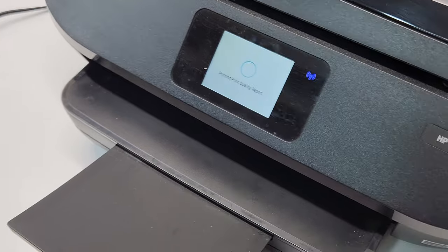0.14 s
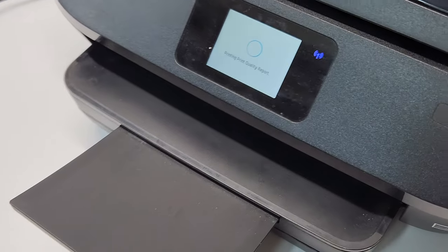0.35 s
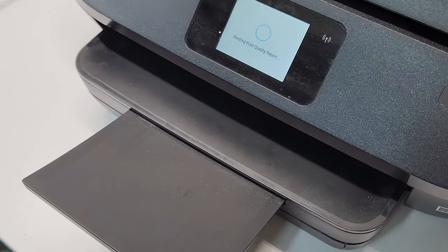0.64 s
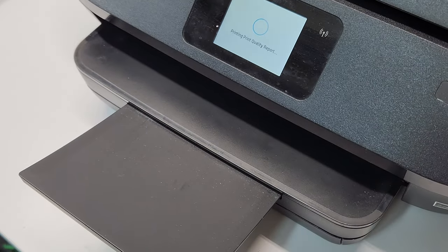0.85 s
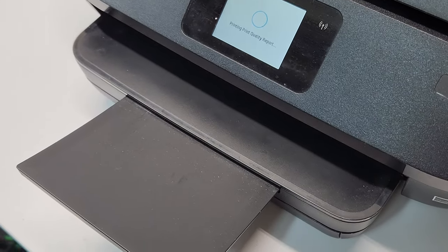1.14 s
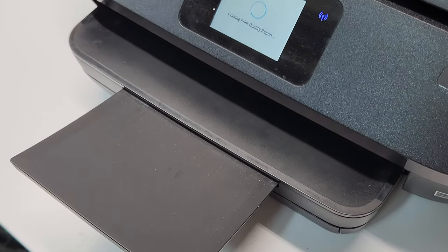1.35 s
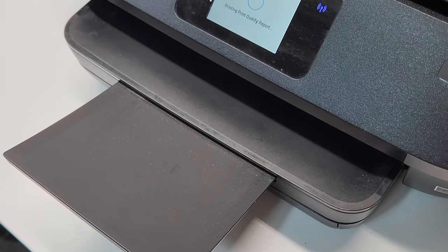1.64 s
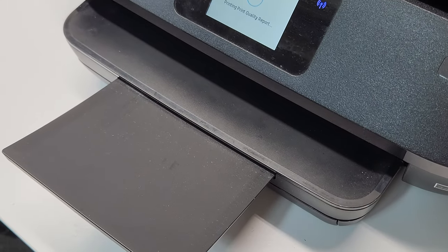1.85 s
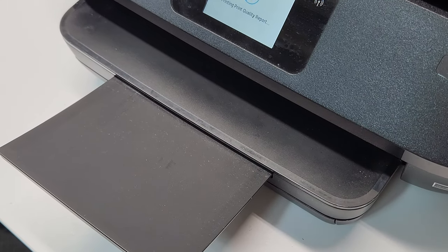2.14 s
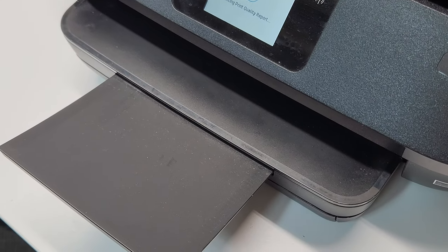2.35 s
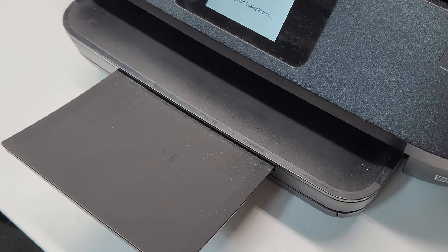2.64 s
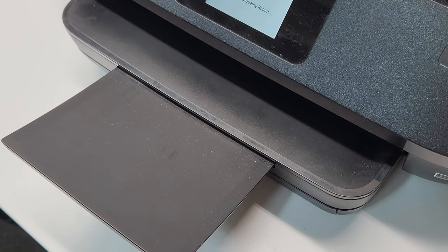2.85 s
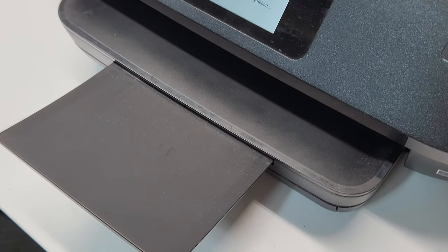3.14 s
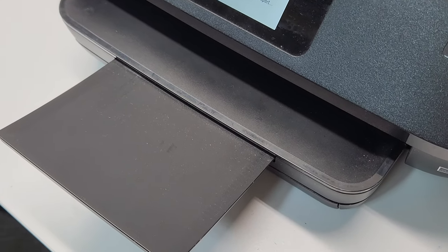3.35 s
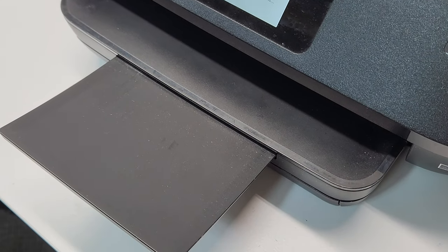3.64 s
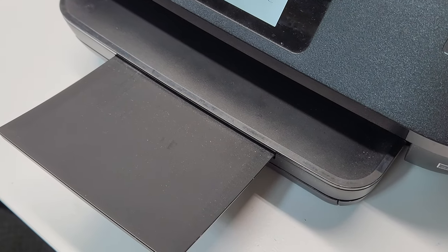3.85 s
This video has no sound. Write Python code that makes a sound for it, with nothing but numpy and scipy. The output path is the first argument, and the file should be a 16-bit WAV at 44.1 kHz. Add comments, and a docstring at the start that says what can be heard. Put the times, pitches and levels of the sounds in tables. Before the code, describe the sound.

Inkjet printer working: low wavering hum, three short rattling geared strokes, knocks and latch clicks

```python
"""A motor's whine dies away over a wavering low hum: an inkjet printer on a desk, close to the microphone.
A part catches and rubs, and the drive runs on quietly, hissing and rumbling from filtered noise.
Three short geared strokes, made of tooth clicks and scraping, rattle the resonant plastic case.
Knocks and latch snaps, bursts of noise that die in milliseconds, come with their starts and stops.
Another fast move whines with gear tones; a small room answers the printer and faint air lies beneath."""
import sys
import numpy as np
from scipy import signal
from scipy.fft import rfft, irfft
from scipy.io import wavfile
from scipy.ndimage import uniform_filter1d

SR = 44100
rng = np.random.default_rng(int(sys.argv[2]) if len(sys.argv) > 2 else 0)


def transcribe(signal):
    """Save signal, clipped to [-1, 1], as a 16-bit WAV file at the path in sys.argv[1]."""
    frames = np.atleast_2d(signal).T
    limited = np.clip(frames, -1, 1)
    pcm = np.round(limited * 32767).astype(np.int16)
    wavfile.write(sys.argv[1], SR, pcm)


N = 176400  # samples, 4 s

# ringing modes of the plastic case: f/Hz, width/Hz, level/dB
CASE_MODES = [(393, 10, -9), (439, 21, -9), (548, 26, -1.5), (601, 77, 5), (773, 70, -5), (869, 49, 3),
              (1007, 28, -7), (1166, 38, -0.5), (1383, 28, -2.5), (2160, 25, -6), (2520, 39, -13),
              (2980, 51, -10.5), (3280, 57, -11.5)]
INSIDE_T60_S = 0.0089  # echoes inside the case
MID_ONLY = np.array([[1], [0]])  # puts a sound in the middle, none in the side


def undb(db):
    """Decibels to gain."""
    return 10 ** (np.asarray(db) / 20)


def unit(x):
    """Scale to rms 1."""
    return x / np.sqrt(np.mean(x ** 2))


def noise():
    """Two unrelated white noises, one for the middle and one for the side."""
    return rng.standard_normal((2, N))


def bins_hz():
    """Frequency of every spectral bin, kept just above zero."""
    return np.arange(N // 2 + 1) * SR / N + 1e-6


def curve(points):
    """Gain at every frequency from (Hz, dB) points, joined on a logarithmic frequency axis."""
    hz, db = np.array(points, float).T
    return undb(np.interp(np.log(bins_hz()), np.log(hz), db))


def colour(points):
    """Causal (minimum-phase) response of unit power through (Hz, dB) points."""
    gain = curve(points)
    cepstrum = irfft(np.log(gain), N)
    cepstrum[1:N // 2] *= 2
    cepstrum[N // 2 + 1:] = 0
    return np.exp(rfft(cepstrum)) / np.sqrt(np.mean(gain ** 2))


def resonances(modes):
    """Response of unit power of (Hz, width, dB) modes, each dark well above its centre."""
    f = bins_hz()
    response = 0
    for hz, width, db in modes:
        peak = 1 / (1 + 1j * (f * f - hz * hz) / (f * width))
        response = response + undb(db) * peak / (1 + .5j * f / hz) ** 2
    return response / np.sqrt(np.mean(abs(response) ** 2))


def through(x, response):
    """Filter by a frequency response."""
    return irfft(rfft(x) * response, N)


def walk(rate):
    """Smooth random wander with spread near 1, drawn anew at this rate in Hz."""
    k = max(int(SR / rate), 1)
    steps = np.repeat(rng.standard_normal(N // k + 1), k)
    return unit(uniform_filter1d(uniform_filter1d(steps, k), k)[:N])


def gate(start, length, attack, release, swell_db=0):
    """Linear attack, a hold that swells from -1.5 to -0.5 times swell_db, and an exponential release."""
    t = np.arange(N) / SR - start
    rise = np.clip(t / attack, 0, 1)
    swell = undb(swell_db * (np.clip(t / length, 0, 1) - 1.5))
    return rise * swell * np.exp(-np.maximum(t - length, 0) / release)


def blows(rows, decay_s, response):
    """Each (s, dB) blow is a sudden burst of contact chatter that dies in milliseconds."""
    t = np.arange(N) / SR
    force = sum(undb(db) * (t >= s) * np.exp(-np.maximum(t - s, 0) / decay_s) for s, db in rows)
    return through(force * noise(), response)


def tail(t60):
    """Two unrelated tails of dense echoes, of unit energy, falling 60 dB in t60 seconds."""
    h = noise() * undb(-60 * np.arange(N) / SR / t60)
    return h / np.sqrt(np.sum(h ** 2, axis=1, keepdims=True))


def cavity():
    """The inside of the case: direct sound plus a share of very short echoes."""
    share = 0.24  # of the power
    return np.sqrt(1 - share) + np.sqrt(share) * rfft(tail(INSIDE_T60_S))


def hum():
    """Low motor tones that waver in strength and phase while their common level drifts."""
    # motor tones: f/Hz, level before the drift/dB, wavering share
    tones = [(59.2, -55, .5), (118.6, -47, .5), (123, -52, .7), (279.5, -60, .4), (298, -59, .6)]
    # drift of the hum: t/s, level/dB
    drift = [(0, 1), (.8, 1), (1.05, -1.5), (1.4, -0.5), (2.5, 0.5), (2.75, -2), (3.2, -4.5), (3.4, 2.5),
             (3.6, -4), (4, -2.5)]
    waver_hz = 14
    turn = 2j * np.pi * np.arange(N) / SR
    out = 0
    for hz, db, waver in tones:
        size = 1 + waver * (walk(waver_hz) + 1j * walk(waver_hz))
        out = out + undb(db) * unit(np.real(size * np.exp(turn * hz)))
    return out * undb(np.interp(np.arange(N) / SR, *np.array(drift).T))


def moving_air():
    """Faint air around the microphone: coloured noise whose level flickers slightly."""
    # spectrum of the air: f/Hz, level per Hz/dB
    spectrum = [(20, -14), (60, -5.5), (90, -9.5), (120, -3), (150, -13), (190, -24.5), (225, -18),
                (295, -18.5), (340, -25.5), (650, -29), (1000, -32.5), (1500, -34), (1800, -39),
                (2300, -40), (3700, -51.5), (5200, -51), (6400, -59), (7900, -58.5), (9600, -64),
                (11000, -73), (16000, -69)]
    level_db, flicker_db = -44.5, 1.12
    return undb(level_db + flicker_db * walk(11)) * through(noise(), colour(spectrum))


def gear_tones():
    """Meshing gears follow one pitch; each tone wobbles and flutters on its own."""
    # path of the gear pitch: t/s, f/Hz
    pitch = [(0, 1025), (2.168, 1020), (2.212, 1007), (2.28, 1028), (2.295, 1055)]
    # tones of the gears: multiple of the pitch, level/dB
    partials = [(1, 0), (1.74, -16), (2.11, -12), (2.99, -16)]
    wobble, flutter_db = .015, 2.5
    hz = np.interp(np.arange(N) / SR, *np.array(pitch).T)
    out = 0
    for multiple, db in partials:
        size = undb(db + flutter_db * walk(70))
        phase = 2 * np.pi * np.cumsum(multiple * hz * (1 + wobble * walk(200))) / SR
        out = out + size * np.sin(phase)
    return unit(out)


def motor_whistle():
    """A thin motor whistle: one sine that glides up and down, with a shaky pitch and level."""
    # path of the whistle: t/s, f/Hz
    path = [(.035, 12500), (.07, 13500), (.095, 13500), (.115, 12800), (.145, 12200)]
    level_db = -77
    at, hz = np.array(path).T
    pitch = np.interp(np.arange(N) / SR, at, hz) * (1 + 0.0036 * walk(600))
    tone = np.sin(2 * np.pi * np.cumsum(pitch) / SR) * undb(2.4 * walk(210))
    return undb(level_db) * tone * gate(at[0], at[-1] - at[0], .02, 0.0035)


def motor():
    """Fast moves sing surging gear tones over gritty whirr, chatter and hiss; a thin whistle joins once."""
    # fast moves: start t/s, length/s, level/dB, gear tone above that level/dB
    moves = [(-.1, .1, -48.5, 9), (2.131, .139, -47.5, 2.5)]
    # ringing of the whine: f/Hz, width/Hz, level/dB
    whine_modes = [(1060, 90, 1), (1423, 80, 2), (1870, 120, 1), (2130, 120, 0.5), (2660, 45, -14),
                   (3030, 110, -6.5)]
    # spectrum of the hiss: f/Hz, level per Hz/dB
    hiss_spectrum = [(300, -29), (800, 2.5), (2200, 1), (3800, -4.5), (5700, -1.5), (8000, -9.5),
                     (12000, -16), (16000, -23)]
    # gear chatter within a fast move: t/s, level/dB
    chatters = [(2.156, -47), (2.198, -49), (2.213, -50), (2.23, -48), (2.241, -48)]
    attack_s, release_s, chatter_decay_s = 0.022, 0.032, 0.0083
    tone_lag_s, tone_attack_s, tone_release_s = .013, .012, .007
    turn_s, turn_dip_db = .054, -11  # the tones dip once in each turn of the shaft
    whirr_db, hiss_db, grit_db, grit_hz = -15, -5.5, -2, 139
    t = np.arange(N) / SR
    effort, singing = 0, 0
    for s, length, db, tone_db in moves:
        effort = effort + undb(db) * gate(s, length, attack_s, release_s)
        sing_at = s + tone_lag_s
        dip = np.cos(np.pi * (t - sing_at) / turn_s) ** 8
        level = undb(db + tone_db + turn_dip_db * dip)
        singing = singing + level * gate(sing_at, length, tone_attack_s, tone_release_s)
    ring = resonances(whine_modes)
    whirr = unit(through(noise() * undb(grit_db * walk(grit_hz)), ring))
    hiss = through(noise(), colour(hiss_spectrum))
    tones = singing * gear_tones() + motor_whistle()
    chatter = blows(chatters, chatter_decay_s, ring)
    return effort * (undb(whirr_db) * whirr + undb(hiss_db) * hiss) + chatter + tones * MID_ONLY


def drive():
    """Slow running: shafts hiss and ring faintly inside the case, and the chassis rumbles and drones."""
    # slow runs: start t/s, length/s, hiss level/dB, rumble level/dB, swell/dB (levels before the swell)
    runs = [(0.015, 0.2, -63.5, -49.5, -0.5), (0.39, 0.125, -58, -50.5, -3.5), (1.045, 0.44, -70, -64, -1),
            (1.986, 0.15, -61, -42, 0.5), (2.141, 0.42, -67, -47, 0), (2.51, 0.36, -63, -52.5, 0.5),
            (2.89, 0.392, -62, -47, 1)]
    # spectra of hiss and rumble: f/Hz, level per Hz/dB
    hiss_spectrum = [(400, 12.5), (1200, -1.5), (2400, 1.5), (4000, -2), (6500, -14.5), (9500, -14.5),
                     (15000, -36)]
    rumble_spectrum = [(30, -7.5), (75, 7), (125, 1), (170, 1.5), (250, -4), (350, -12.5), (530, -10.5),
                       (800, -17), (2000, -63)]
    # ringing of shafts and frame, of the drone, and low in the chassis: f/Hz, width/Hz, level/dB
    shaft_modes = [(523, 23, 8), (3100, 120, -1), (3410, 75, -2.5), (3970, 75, -15), (4750, 240, -7),
                   (7330, 240, -13)]
    drone_modes = [(522, 14, 0), (619, 25, -6), (861, 30, -9)]
    chassis_modes = [(168, 15, 1), (214, 17.5, 1), (256, 19, -0.5), (367, 21.4, -7)]
    attack_s, release_s = 0.015, 0.028
    ring_db, rumble_db, chassis_db = -9.5, -3, -3.5
    drone_db, drone_start_s, drone_length_s = -54.5, .39, .17
    hiss, rumble = 0, 0
    for s, length, run_hiss_db, run_rumble_db, swell in runs:
        on = gate(s, length, attack_s, release_s, swell)
        hiss = hiss + undb(run_hiss_db) * on
        rumble = rumble + undb(run_rumble_db) * on
    shafts = through(noise(), colour(hiss_spectrum) * cavity())
    shafts = shafts + undb(ring_db) * through(noise(), resonances(shaft_modes))
    chassis = undb(rumble_db) * through(noise(), colour(rumble_spectrum))
    chassis = chassis + undb(chassis_db) * through(noise(), resonances(chassis_modes))
    drone = undb(drone_db) * through(noise(), resonances(drone_modes))
    drone = drone * gate(drone_start_s, drone_length_s, attack_s, release_s)
    return hiss * shafts + rumble * chassis + drone


def rubbing():
    """A light part catches and then drags, ringing the same modes."""
    # catches: t/s, level/dB
    catches = [(.098, -50), (.104, -43)]
    # rubs: start t/s, length/s, level before the swell/dB, swell/dB
    rubs = [(0.101, 0.167, -63.5, -5)]
    # ringing of the light part: f/Hz, width/Hz, level/dB
    part_modes = [(2000, 230, 1), (2180, 240, 8.5), (2730, 550, 4.5), (3160, 320, 4), (3450, 130, -5),
                  (4600, 200, 1), (7200, 200, -14)]
    catch_decay_s = 0.0072
    ring = resonances(part_modes)
    drag = sum(undb(db) * gate(s, length, 0.0037, 0.015, swell) for s, length, db, swell in rubs)
    return blows(catches, catch_decay_s, ring) + through(drag * noise(), ring)


def impacts():
    """Knocks crack and ring the case and the stop, duller when the contact is soft; latches snap brightly."""
    # knocks at the stops and dull jolts under load:
    # t/s, level/dB, decay/s, brightness f/Hz, ringing of the stop/dB
    hits = [(.2668, -26.5, .007, 7000, 1), (.2725, -27, .005, 1400, -8), (.311, -28, .012, 850, -30),
            (.325, -28, .007, 900, -30), (.344, -28, .006, 1100, -20), (1.922, -37, .004, 5000, -2),
            (1.964, -31, .005, 1200, -20), (1.979, -33, .005, 5000, -8), (2.034, -41, .008, 3000, -8),
            (2.4442, -27, .008, 3400, -8), (2.469, -27, .006, 750, -30), (2.485, -26.5, .007, 1000, -30),
            (2.499, -27.5, .003, 4500, -12)]
    # latch snaps and small ticks: t/s, level/dB
    snaps = [(.104, -56), (.159, -62), (1.9785, -28.5), (2.509, -34), (3.266, -67)]
    # spectra of a knock and a snap: f/Hz, level per Hz/dB
    knock_spectrum = [(100, -36.5), (400, 4.5), (700, 10), (1400, 9), (2400, -3.5), (3700, -8.5),
                      (4700, -2.5), (8000, -10), (10000, -24), (15000, -7)]
    snap_spectrum = [(500, -24), (2000, -3), (4000, 7), (7500, 4.5), (10000, 1), (14000, -5.5), (16000, -4)]
    # ringing of the hard stop: f/Hz, width/Hz, level/dB
    stop_modes = [(2174, 160, 9.5), (2480, 380, -3.5), (3450, 120, 6.5), (3926, 125, 1)]
    case_ring_db, snap_decay_s = -7.5, 0.0046
    f = bins_hz()
    knock = colour(knock_spectrum) + undb(case_ring_db) * resonances(CASE_MODES)
    stop = resonances(stop_modes)
    out = blows(snaps, snap_decay_s, colour(snap_spectrum))
    for s, db, decay, bright_hz, ring_db in hits:
        softness = 1 / (1 - (f / bright_hz) ** 2 + 1j * f / bright_hz)  # low-pass of the contact
        out = out + blows([(s, db)], decay, (knock + undb(ring_db) * stop) * softness)
    return out


def teeth(hz, count=1600):
    """Clicks of gear teeth, uneven in spacing and strength."""
    jitter, scatter_db = .08, 4.5  # share of the spacing, spread of the strength
    chance = rng.standard_normal((count, 2))
    gaps = np.maximum(1 + jitter * chance[:, 0], .1)
    at = (np.cumsum(gaps) * SR / hz).astype(int)
    return unit(np.bincount(at[at < N], undb(scatter_db * chance[at < N, 1]), N))


def strokes():
    """Gear teeth and scraping shake the case; the sliding plastic hisses as it gathers speed."""
    # gear strokes: start t/s, length/s, level before the swell/dB, tooth rate f/Hz, swell/dB
    moves = [(0.271, 0.069, -28, 285.6, 3.5), (1.917, 0.069, -26, 294.7, 6), (2.443, 0.06, -26.5, 291, 4.5)]
    # spectra of the case panels and the sliding plastic: f/Hz, level per Hz/dB
    panel_spectrum = [(60, -15.5), (200, 0.5), (310, -14), (600, -1.5), (1300, -3), (1750, -8), (3300, -12),
                      (6000, -22), (15000, -39)]
    slide_spectrum = [(500, -17), (2000, -5.5), (3400, 0.5), (4400, 0), (5300, 4), (6500, -7), (7400, 1.5),
                      (9200, -13.5), (10500, -7.5), (13000, -14), (16000, -11.5)]
    attack_s, release_s, slide_rise_s, slide_release_s = 0.0079, 0.011, 0.019, 0.018
    inside_db, scrape_db, panels_db, slide_db = -6, -4.5, 1.5, -10
    thump_hz, thump_width_hz, thump_db = 81, 280, -10.5  # the whole printer shakes on the desk
    clicks, scrape, slide = 0, 0, 0
    for s, length, db, hz, swell in moves:
        force = undb(db) * gate(s, length, attack_s, release_s, swell)
        clicks = clicks + force * teeth(hz)
        scrape = scrape + force
        slide = slide + undb(db) * gate(s, length, slide_rise_s, slide_release_s, swell)
    inside = undb(inside_db) * through(clicks, rfft(tail(INSIDE_T60_S)))
    push = .5 * (inside + clicks * MID_ONLY) + undb(scrape_db) * scrape * noise()
    body = through(push, resonances(CASE_MODES))
    panels = through(.5 * inside + .5 * scrape * noise(), colour(panel_spectrum))
    thump = through(scrape * noise(), resonances([(thump_hz, thump_width_hz, 0)]))
    hiss = through(slide * noise() * undb(2 * walk(700)), colour(slide_spectrum) * cavity())
    return body + undb(panels_db) * panels + undb(thump_db) * thump + undb(slide_db) * hiss


def small_room(printer):
    """The printer at the microphone plus the room's coloured tail of dense echoes."""
    # colour of the echoes: f/Hz, level/dB
    echo_colour = [(100, -4), (1500, 1), (5000, -0.5), (15000, -6.5)]
    t60_s, level_db = 0.22, -9
    return printer + undb(level_db) * through(printer, rfft(tail(t60_s)) * curve(echo_colour))


def stereo(pair, width):
    """Middle and side to left and right, the side scaled by frequency."""
    return pair[0] + through(pair[1], curve(width)) * np.array([[1], [-1]])


def scene():
    """The printer in its small room with moving air, spread before the microphones, over a central hum."""
    # side against middle: f/Hz, level/dB
    air_width = [(60, -16), (110, -25.5), (200, -9.5), (380, -7), (700, -3), (1290, 2), (2400, -0.5),
                 (15000, 0)]
    printer_width = [(60, -24), (200, -17), (380, -10.5), (700, -7.5), (1290, -3), (2400, 0), (4400, -1.5),
                     (15000, 0.5)]
    # left against right: f/Hz, level/dB
    balance = [(100, 0), (300, .4), (600, 1.7), (2500, 1.8), (5500, -1), (14000, -1.7)]
    printer = small_room(motor() + drive() + rubbing() + impacts() + strokes())
    both = stereo(printer, printer_width) + stereo(moving_air(), air_width)
    lean = curve(balance) ** np.array([[.5], [-.5]])  # half to each channel, in opposite senses
    return through(both, lean) + hum()


def record(dry):
    """The recorder cuts the top steeply."""
    top_hz = 15900
    return signal.sosfilt(signal.ellip(10, .2, 70, top_hz, fs=SR, output="sos"), dry)


dry = scene()
out = record(dry)
transcribe(out)
```